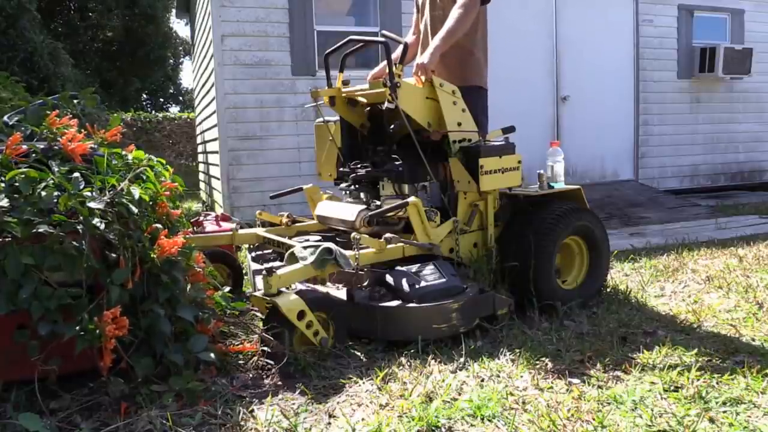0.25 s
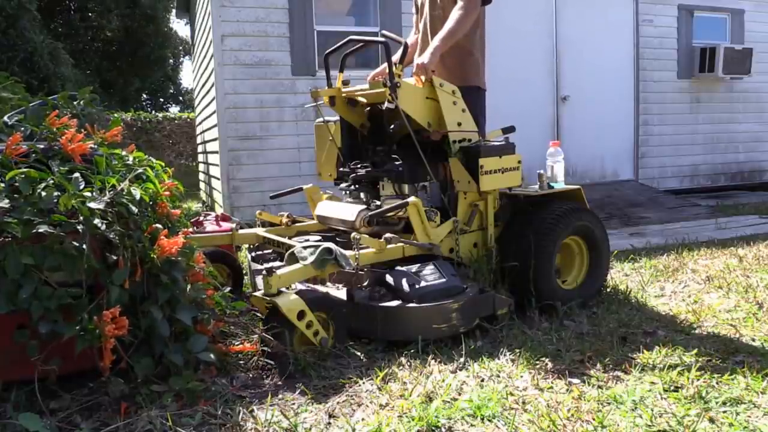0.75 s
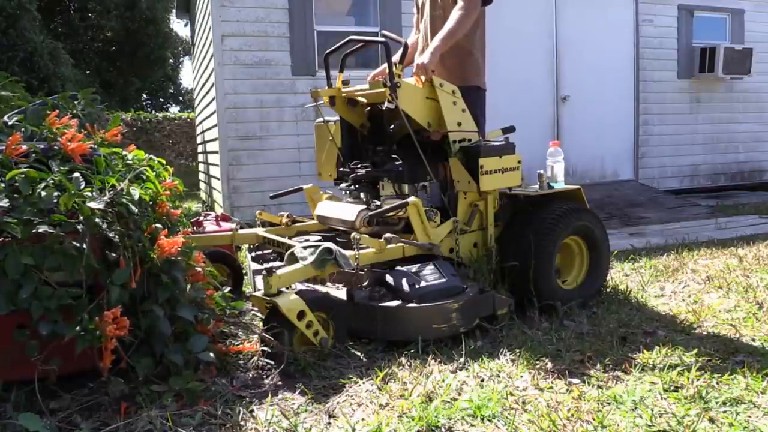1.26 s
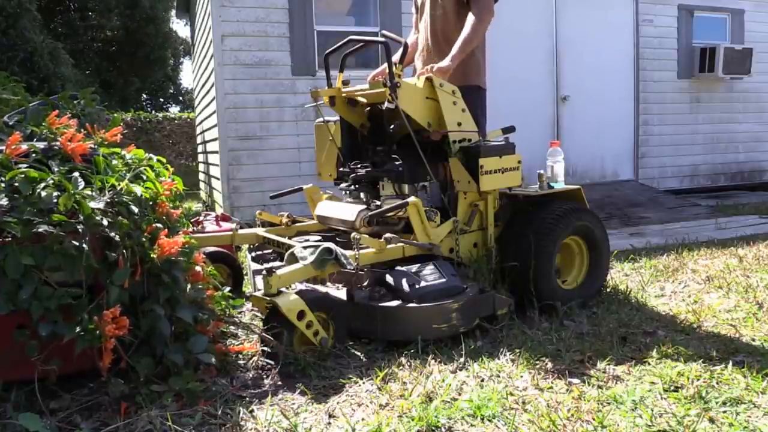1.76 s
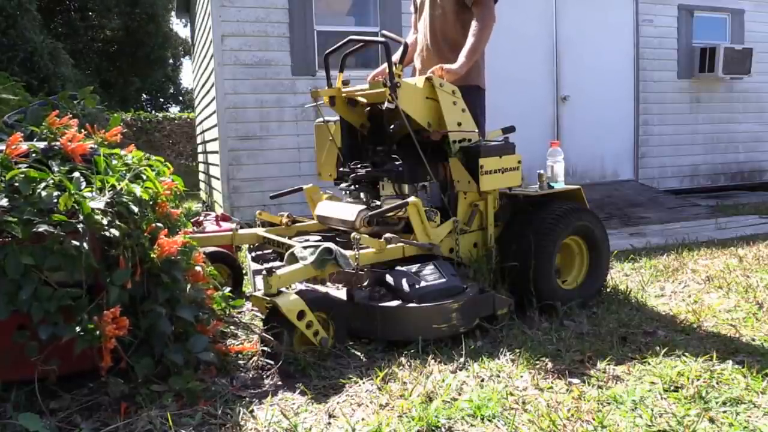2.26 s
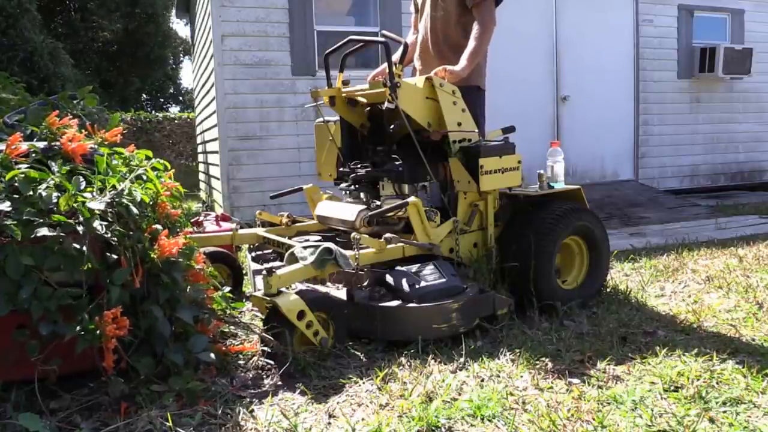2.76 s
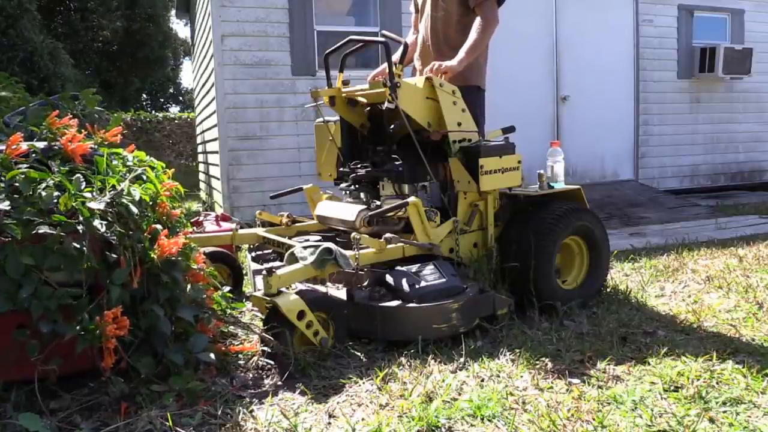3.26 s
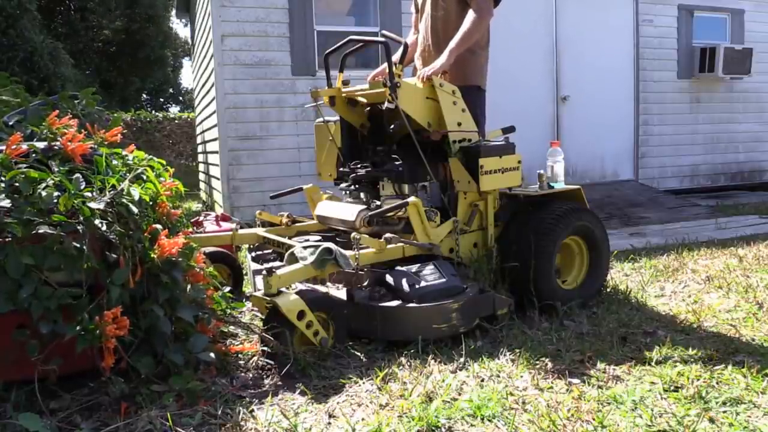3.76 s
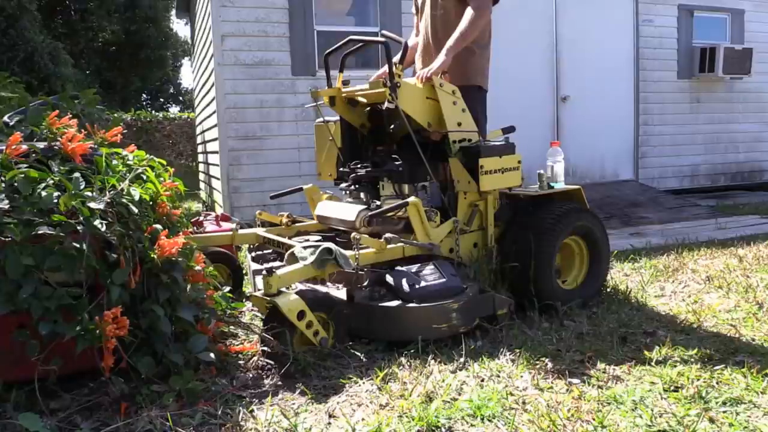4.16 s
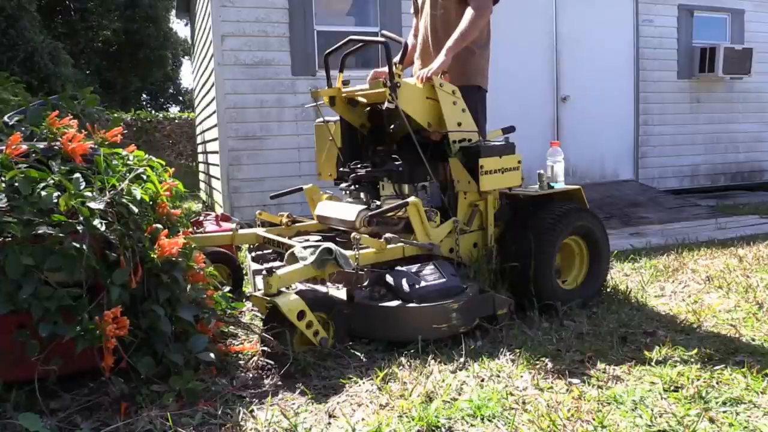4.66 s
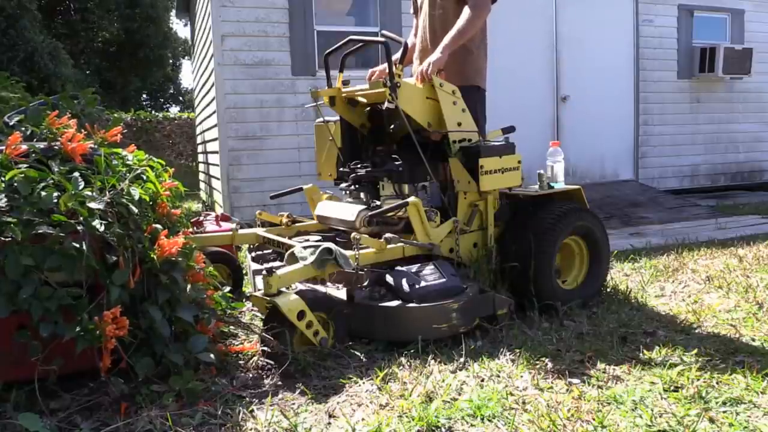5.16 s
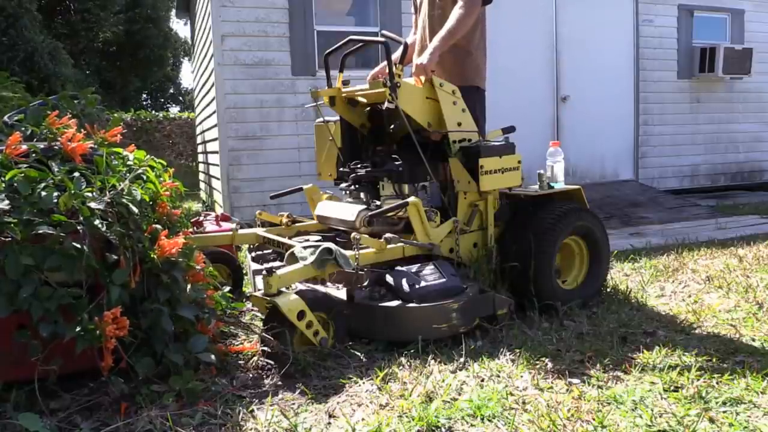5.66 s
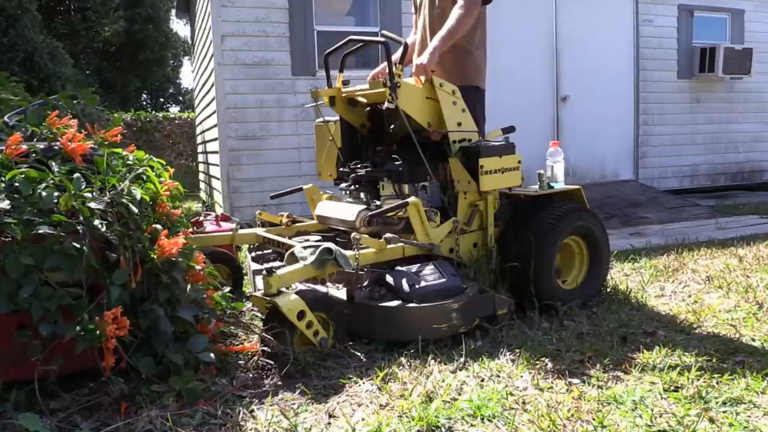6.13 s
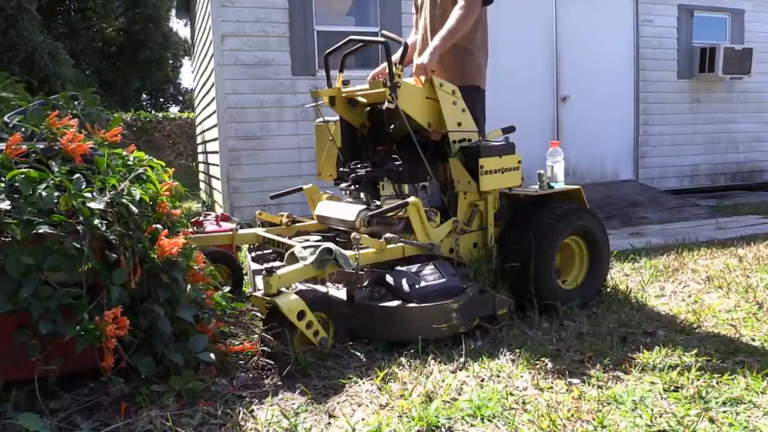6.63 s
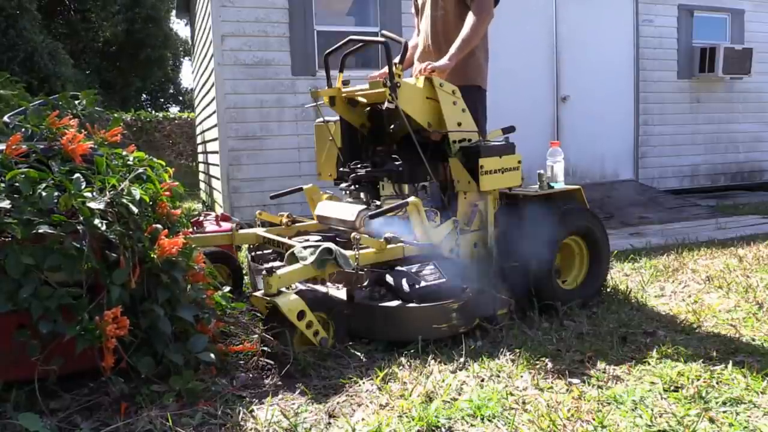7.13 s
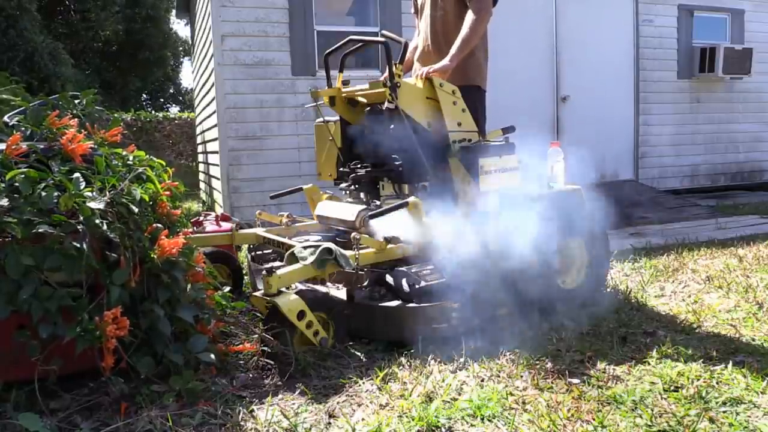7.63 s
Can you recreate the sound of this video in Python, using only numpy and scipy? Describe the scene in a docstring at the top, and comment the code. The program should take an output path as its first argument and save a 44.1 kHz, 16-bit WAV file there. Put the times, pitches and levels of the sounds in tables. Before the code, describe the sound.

A quiet garden by a house, with a mower a few metres away, leaning slightly left, and short scattered reflections. At 0.1 s a metallic click and gear slam start the electric starter: its whine rises quickly within half a second, then creeps slightly higher, a harsh, bright grinding of rattling teeth that pulses with each engine turn. At 3.8 s it lets go abruptly. Clicks and loose drive-train knocks follow as the engine slows, with a short rising, squeaky belt groan around 4.55 s and a faint soft thump at 4.8 s. Near silence until key clicks and a tiny tinkle at 5.05-5.1 s. At 5.3 s the starter slams in and whines up again, stopping around 6.3 s. The engine coughs at 6.4 s, splutters slowly with clicks and misfires, catches around 7 s and gathers speed, knocking, clacking and puffing low exhaust pulses, until the end near 7.9 s.

```python
"""Lawn beside a house: a stand-on mower is started a few metres away, in a quiet garden.
The starter whines up and grinds the engine round with rattling gears (swept tones, tooth strikes), lets go,
and the engine coasts to a stop with a groan (resonant knocks, a gliding tone with overtones).
The key clicks, the starter slams in again (bursts of tiny contacts), and the engine coughs, catches and
gathers speed (knocks, exhaust pulses and valve clacks timed by its cycles)."""
import sys
import numpy as np
from scipy import signal
from scipy.fft import rfft, irfft
from scipy.io import wavfile
from scipy.ndimage import map_coordinates

SR = 44100
rng = np.random.default_rng(int(sys.argv[2]) if len(sys.argv) > 2 else 0)


def file_out(sig):
    """Save sig as 16-bit WAV at sys.argv[1]."""
    # one column per channel
    cols = np.atleast_2d(sig).T
    # limit, then scale
    lim = np.clip(cols, -1, 1)
    pcm = np.round(lim * 32767).astype(np.int16)
    wavfile.write(sys.argv[1], SR, pcm)


N = 347949
TIME = np.arange(N) / SR  # s

# All levels are relative.
# Garden colour: (frequency [Hz], gain [dB])
GARDEN_COLOUR = [(15, -59), (25, -39), (69, -18.5), (91, -4), (133, -3), (297, -11), (1050, -6.5),
                 (1660, -9.5), (5010, -17), (9810, -28), (10600, -27), (13500, -38), (15500, -47)]
GARDEN_DB = -47
# Decay of the scattered tail: (frequency [Hz], t60 [s])
YARD_DECAY = [(100, 0.19), (1000, 0.45), (5000, 0.096), (14000, 0.25)]
# Scattered sound: (frequency [Hz], level [dB])
YARD_SPREAD = [(100, -32), (350, -12), (1000, -12.5), (2800, -8.5), (5500, -6), (9000, -6.5), (14000, -26)]
# Stereo lean of the mower: (frequency [Hz], left minus right [dB])
STEREO_LEAN = [(120, -0.5), (300, -1), (700, 3.5), (1400, 2), (3000, 2.5), (6000, 2.5), (10000, 1.5),
               (14000, -0.5)]
MOWER_DB, EDGE_HZ = -0.56, 15600

# A key on the ring tinkles: (time [s], frequency [Hz], level [dB], decay time [s])
KEY_TINKLES = [(5.103, 2970, -43, .018), (5.05, 6250, -46, .02)]
# Deck belt groan: (time [s], pitch [Hz], level [dB])
BELT_GROAN = [(4.535, 440, -37), (4.55, 451, -42), (4.56, 472, -27), (4.58, 494, -34), (4.61, 500, -37),
              (4.66, 500, -53)]
# Its overtones: (multiple of the pitch [-], level [dB])
BELT_ORDERS = [(1, -0.5), (2, -17), (3, -3.5), (4, -9)]
DULLING_DB_PER_S = 110

# Metal clicks of solenoid, valve gear and key: (time [s], level [dB], treble [dB])
CLICKS = [(0.097, -13, -2.5), (3.881, -4, -19), (3.979, -15, -19), (4.02, -3, -28), (4.111, -9, -15.5),
          (4.347, -15, -19), (5.049, -10, -25), (5.101, -21, -24), (5.3, -21.5, 4), (6.374, -5, -5.5),
          (6.464, -19, -8), (6.996, -9, -8), (7.132, -5.5, -2.5)]
# Pinion slams into the ring gear: (time [s], level [dB])
SLAMS = [(0.123, -8), (5.327, -10.5)]
# Engine rocks back on its mounts: (time [s], level [dB])
THUMPS = [(4.785, -39), (4.815, -51), (4.98, -51)]
# Click and slam colours: (frequency [Hz], gain [dB])
CLICK_COLOUR = [(100, -14), (500, -1.5), (900, 9), (1400, 6), (2200, -4), (3000, 8), (5000, 4), (8000, -1),
                (15000, -19)]
SLAM_COLOUR = [(20, -45), (70, -26), (200, -12), (400, 3), (1500, 4), (2800, 4.5), (3700, -2), (7000, -4.5),
               (10000, -13.5), (15500, -25)]
CLICK_DB, CLICK_TREBLE_DB, CLICK_DECAY_S = -18, 16.5, 0.018  # dB: added to the columns

# Turns of the key: (motor on [s], let go [s], crank position [turns],
# whine [dB], gear rattle [dB], block [dB], puffs [dB])
ATTEMPTS = [(0.125, 3.812, 0, 3.5, -20, -29.5, -43), (5.34, 6.3, 0.24, 1.5, -19, -32, -54)]
# Quick spin-up, then a creep to the top tooth rate
TOP_TOOTH_HZ, SPIN_UP_S, CREEP_SHARE, CREEP_S = 1335.8, 0.2617, 0.1148, 1.897
RING_TEETH, PINION_TEETH = 115, 15
COAST_S = 0.7

# Loose drive train knocks while coasting: (time [s], level [dB])
COAST_KNOCKS = [(3.899, -21), (3.925, -25), (3.981, -28), (4.005, -24), (4.179, -23.5), (4.266, -26),
                (4.319, -26), (4.448, -32)]
# Block and breath colours: (frequency [Hz], gain [dB])
BLOCK_COLOUR = [(60, -33.5), (200, -9), (330, -4.5), (420, 0), (600, 0), (880, 4), (1050, -5), (1220, 2),
                (1600, -1), (2400, -3.5), (3500, -14), (6000, -17), (10000, -33), (15500, -68)]
BREATH_COLOUR = [(20, -40), (40, -19), (70, -4), (110, -2), (175, 0.5), (230, -3.5), (300, -1.5),
                 (450, -16.5), (900, -40)]
# Block resonances: (frequency [Hz], width [Hz], gain [dB])
BLOCK_MODES = [(416, 56, 7.7), (909, 82, 5.9), (1131, 85, 9)]
# One puff per cylinder: (share of the cycle [-], height over the steady flow [dB])
PUFFS = [(0.95, 11.5), (0.337, 8)]
PUFF_GROWTH_DB_PER_S, PUFF_WIDTH_CYCLES = 3, 0.045
# Shudder as the block is jerked from rest; it quietens while coasting
JERK_DB, JERK_S, COAST_DB_PER_S = 7, 0.068, 12

# Engine under its own power: (time [s], block [dB], valve gear [dB], exhaust [dB])
RUNNING = [(6.32, -16.5, -28, -34), (6.336, -22, -26, -31), (6.528, -24, -31.5, -46),
           (6.638, -19.5, -22, -27), (6.766, -20, -30, -47), (6.826, -18, -22.5, -22.5),
           (6.996, -17.5, -19.5, -31), (7.028, -15, -23, -18.5), (7.05, -15, -23, -25),
           (7.758, -19, -21.5, -19), (7.78, -15.5, -22, -22), (7.89, -17.5, -23, -16)]
# Engine speed from the first cough: (time [s], rate [cycles/s])
ENGINE_SPEED = [(6.403, 4.9), (6.72, 4.05), (6.9, 7.27), (7.29, 8.25), (7.42, 10.64), (7.66, 12.12),
                (7.89, 12.84)]
# Pulses within a cycle: (share of the cycle [-], exhaust [dB], valve clack [dB])
STROKES = [(0.146, -6, 2), (0.34, -6, -2), (0.66, -5.5, -1), (0.019, -16, -15)]
# Running colours: (frequency [Hz], gain [dB])
RUN_COLOUR = [(80, -24), (250, 3.5), (400, -3.5), (600, -0.5), (880, 3), (1100, -3), (1400, 3),
              (2200, -4.5), (2700, -2.5), (3500, -8.5), (6000, -19.5), (15000, -32.5)]
VALVE_COLOUR = [(500, -37), (2000, -14), (2700, 3), (3400, 4.5), (4300, 3.5), (5200, 2.5), (6600, 0.5),
                (8300, -2), (9500, -8), (12000, -9), (14000, -21), (15600, -60)]
EXHAUST_COLOUR = [(20, -23), (45, -22), (80, -5), (130, 0), (200, 0.5), (260, -5.5), (400, -6), (900, -14),
                  (3000, -67)]
KNOCK_COLOUR = [(200, -35), (550, -1), (780, 3.5), (1100, -10), (2000, -14), (8000, -39)]
# Valve gear resonances: (frequency [Hz], width [Hz], gain [dB])
VALVE_MODES = [(2630, 80, 8.3), (3550, 230, 3.7), (4830, 83, 3.5)]
# One cough, misfires until it catches, then one knock per cycle
COUGH_DB, CATCH_S, KNOCK_DB, KNOCK_SCATTER_DB = -13.5, 7.05, -10, 1.9
RUN_BLOCK_DB, RUN_VALVE_DB, RUN_EXHAUST_DB = 0.06, 1.5, -1.0  # added to the columns of RUNNING

# Once a turn a piston slows the crank and presses the teeth harder
SAG_SHARE, SAG_AT_TURN, SAG_PRESS_DB = 0.042, 0.92, 1
# Tooth load peaks twice a turn, unevenly over the two turns of a cycle
LOAD_AT_TURN, LOAD_UNEVEN = 0.15, 0.28
# Whine, overtone, gear and rim colours: (frequency [Hz], gain [dB])
WHINE_COLOUR = [(250, -24.5), (460, -18.5), (600, -29.5), (800, -23), (1080, -28.5), (1300, -30)]
HOUSING_COLOUR = [(400, -8), (850, -7), (1050, -3), (1160, 5), (1300, -2), (1550, -5), (1750, -3),
                  (2100, -5), (2400, -6), (2610, 1), (2800, 3), (3200, -7), (3650, -4), (4200, -7),
                  (4700, 1), (5200, 3), (6000, -9), (9000, -14)]
GEAR_COLOUR = [(300, -67), (1000, 0.5), (2000, -9), (2700, 1), (3250, -4), (4000, 0), (5000, 2),
               (5800, -9.5), (7400, -5), (8800, -7), (10000, -14.5), (12000, -17.5), (14000, -23.5),
               (15600, -53)]
ZING_COLOUR = [(2000, -50), (4500, -20), (4870, -7), (5030, -11), (5200, 0), (5380, -13), (5900, -28),
               (6780, -10), (7400, -26), (8630, -8), (9500, -26), (15000, -50)]
# Housing and gear resonances: (frequency [Hz], width [Hz], gain [dB])
WHINE_MODES = [(934, 52, 13.3), (1007, 41, 4.8), (1169, 58, 12.9)]
GEAR_MODES = [(2647, 89, 0), (2823, 185, 11.5), (3260, 240, -4), (3900, 280, 6), (4030, 410, -8.5),
              (4700, 150, 4.5), (5090, 50, 5.5), (6100, 130, 11.5), (6640, 210, 10.5), (8000, 140, 7),
              (8640, 124, 9), (9670, 100, 9.5), (10430, 86, 12), (10793, 150, 6.5)]
# Gear noise as a power of speed, one per attempt: (exponent [-])
RATTLE_POWERS = [1.6, 2.16]
# Noise dies once the pinion is drawn back; the coasting ring gear chatters faintly
LET_GO_DB_PER_S, CHATTER_DB, CHATTER_PATCHY_DB = 260, -30.5, 4
RINGING_DB = 1.0


def amp(db):
    """Decibels to gain."""
    return 10 ** (np.asarray(db) / 20)


def unit(x):
    """Scales to rms 1."""
    return x / np.sqrt(np.mean(x ** 2) + 1e-20)


def read(points, hz):
    """Reads a spectrum table on a log-frequency axis."""
    f, value = np.transpose(points)
    return np.interp(np.log(hz + 1), np.log(f + 1), value)


def level(rows, order):
    """Gain from one dB column of a time table, fading out beyond its ends."""
    rows = np.asarray(rows)
    outside_s = np.maximum(rows[0, 0] - TIME, 0) + np.maximum(TIME - rows[-1, 0], 0)
    return amp(np.interp(TIME, rows[:, 0], rows[:, order])) * np.exp(-(outside_s / 0.013) ** 2)


def drift(hz):
    """Slow random signal of rms 1, up to about hz."""
    f = np.fft.rfftfreq(N, 1 / SR)
    return unit(irfft(rfft(rng.standard_normal(N)) / (1 + (f / hz) ** 4), N))


def colour(x, points, modes=(), size=8192):
    """Causal minimum-phase filter: a broad colour with resonances on top."""
    hz = np.fft.rfftfreq(size, 1 / SR)
    db = read(points, hz) + sum(d / (1 + (2 * (hz - f) / w) ** 2) for f, w, d in modes)
    log_gain = np.log(amp(np.r_[db, db[-2:0:-1]]))
    taps = np.fft.ifft(np.exp(signal.hilbert(log_gain).conj())).real[:size // 2]
    return signal.oaconvolve(x, taps)[:N]


def in_band(x, band_hz):
    """Scales so that the band (low, high) has rms 1."""
    hz = np.fft.rfftfreq(N, 1 / SR)
    inside = (hz > band_hz[0]) * (hz < band_hz[1])
    return x / np.std(irfft(rfft(x) * inside, N))


def burst(at_s, rise_s, decay_s):
    """Envelope that swells up to at_s and dies away after it."""
    return np.exp(-np.maximum(at_s - TIME, 0) / rise_s - np.maximum(TIME - at_s, 0) / decay_s)


def bursts(table, rise_s, decay_s):
    """Sum of bursts from a table of times and levels."""
    return sum(amp(db) * burst(s, rise_s, decay_s) for s, db in table)


def impacts(per_s, spread_db):
    """Random small impacts of uneven size and random sign, rms 1."""
    size = amp(spread_db * np.clip(rng.standard_normal(N), -2, 2))
    return unit((rng.random(N) < per_s / SR) * rng.choice([-1, 1], N) * size)


def garden():
    """Quiet air: coloured noise, partly shared between left and right."""
    air = np.array([unit(colour(rng.standard_normal(N), GARDEN_COLOUR)) for _ in range(3)])
    return amp(GARDEN_DB) * unit(air[2] + .5 * air[:2])


def yard(x):
    """Wall, bushes and ground scatter a short tail of sparse echoes, different left and right."""
    taps = rng.standard_normal((2, SR // 2)) * (rng.random((2, SR // 2)) < 3000 / SR)
    hz, t, z = signal.stft(taps, SR, nperseg=256)
    z = z * amp(-60 * t / read(YARD_DECAY, hz)[:, None])
    spread = amp(read(YARD_SPREAD, hz))
    z *= spread[:, None] / np.sqrt((abs(z) ** 2).sum(2, keepdims=True))
    tail = signal.istft(z, SR, nperseg=256)[1]
    tail *= np.sqrt(np.mean(spread ** 2)) / np.linalg.norm(tail[0])
    return signal.fftconvolve(x[None], tail, axes=1)[:, :N]


def keys():
    """Small keys ring briefly as decaying sines."""
    return sum(amp(db) * burst(s, .0005, decay_s) * np.sin(2 * np.pi * hz * TIME)
               for s, hz, db, decay_s in KEY_TINKLES)


def belt():
    """The belt sticks and slips on its pulley: a wavering harmonic tone whose overtones fade first."""
    s, hz, _ = np.transpose(BELT_GROAN)
    pitch_hz = np.interp(TIME, s, hz) * (1 + .012 * drift(150))
    angle = 2 * np.pi * np.cumsum(pitch_hz) / SR
    dulling_db = DULLING_DB_PER_S * np.clip(TIME - s[2], -.02, .1)
    partials = sum(amp(db - (k > 1) * dulling_db) * np.sin(k * angle) for k, db in BELT_ORDERS)
    return level(BELT_GROAN, order=2) * partials


def clicks():
    """Sharp flurries of contacts in the steel frame, each with its own treble."""
    flurry = unit(colour(impacts(14000, 4.6), CLICK_COLOUR, [(1620, 410, 6.7), (2720, 150, 4.7)]))
    dull = signal.sosfilt(signal.butter(1, 2500, fs=SR, output="sos"), flurry)
    bright = flurry - dull
    return sum(amp(db + CLICK_DB) * burst(s, 0.00048, CLICK_DECAY_S)
               * (dull + amp(treble_db + CLICK_TREBLE_DB) * bright) for s, db, treble_db in CLICKS)


def slams():
    """The pinion hits the ring gear: dense contacts in a short burst."""
    return unit(colour(impacts(12000, 0.8), SLAM_COLOUR)) * bursts(SLAMS, 0.0065, 0.013)


def thumps():
    """The engine rocks on its mounts: soft low-frequency noise bursts."""
    return unit(colour(rng.standard_normal(N), BREATH_COLOUR)) * bursts(THUMPS, 0.0036, 0.026)


def coasting():
    """With no load on it, the drive train knocks to and fro in its slack and rings the block."""
    modes = [(420, 95, 13.0), (880, 450, 6.1), (1260, 210, 9.9)]
    ring = unit(colour(impacts(8000, 2.3), BLOCK_COLOUR, modes))
    return ring * bursts(COAST_KNOCKS, 0.0013, 0.019)


def cranking():
    """Seconds since key on and let go, starter speed 0-1, coasting speed 1-0, crank turns, four gains."""
    on_s, off_s, position, *db = np.array(ATTEMPTS).T
    current = np.maximum(np.searchsorted(on_s, TIME) - 1, 0)
    since_s = np.maximum(TIME - on_s[current], 0)
    after_s = np.maximum(TIME - off_s[current], 0)
    driven_s = since_s - after_s
    speed = (1 - CREEP_SHARE) * (1 - np.exp(-driven_s / SPIN_UP_S))
    speed = speed + CREEP_SHARE * (1 - np.exp(-driven_s / CREEP_S))
    coast = np.maximum(1 - after_s / COAST_S, 0)
    turns = np.cumsum(speed * coast) * TOP_TOOTH_HZ / RING_TEETH / SR
    turns = turns + (position - np.interp(on_s, TIME, turns))[current]
    return since_s, after_s, speed, coast, turns, amp(db)[:, current]


def turning_over():
    """Pistons, cams and pulleys churn in the block while the cylinders puff through the muffler."""
    since_s, after_s, _, coast, turns, (_, _, block_gain, puff_gain) = cranking()
    moving = np.minimum(since_s / 0.012, 1) * coast ** 0.55
    strokes_db = np.zeros(N)
    for share, db in PUFFS:
        offset_cycles = (turns / 2 - share + .5) % 1 - .5
        strokes_db += db * np.exp(-(offset_cycles / PUFF_WIDTH_CYCLES) ** 2)
    knocks = impacts(3000, 2.4) * amp(0.14 * strokes_db + 1.5 * drift(36))
    block = in_band(colour(knocks, BLOCK_COLOUR, BLOCK_MODES), (1450, 2300))
    puffs = rng.standard_normal(N) * amp(strokes_db + 2 * drift(30))
    breath = in_band(colour(puffs, BREATH_COLOUR, [(174, 22, 4)]), (60, 230))
    block_db = JERK_DB * np.exp(-since_s / JERK_S) - COAST_DB_PER_S * after_s
    puff_db = PUFF_GROWTH_DB_PER_S * (since_s - after_s)
    block = block * block_gain * amp(block_db)
    breath = breath * puff_gain * amp(puff_db) * np.minimum(coast / 0.26, 1) ** 2
    return moving * (block + breath)


def running(count=15):
    """Cycles time the combustion knocks, exhaust pulses and valve clacks over the rattle of the block."""
    cough_s, on = ENGINE_SPEED[0][0], TIME > RUNNING[0][0]
    cycles = np.cumsum(np.interp(TIME, *np.transpose(ENGINE_SPEED))) / SR
    cycles = cycles - np.interp(cough_s, TIME, cycles)
    never_s = 2 * N / SR  # for strokes past the end
    pulses, clacks = np.zeros((2, N))
    knocks = amp(COUGH_DB) * burst(cough_s, 0.0014, 0.0074)
    for k in range(-1, count):
        knock_s = np.interp(k, cycles, TIME, right=never_s)
        knock_db = KNOCK_DB + KNOCK_SCATTER_DB * rng.standard_normal()
        knocks += (knock_s > CATCH_S) * amp(knock_db) * burst(knock_s, 0.00097, 0.0083)
        for share, pulse_db, clack_db in STROKES:
            stroke_s = np.interp(k + share, cycles, TIME, right=never_s)
            pulse_scatter_db, clack_scatter = rng.standard_normal(2)
            pulses += amp(pulse_db + pulse_scatter_db) * burst(stroke_s, 0.0002, 0.00044)
            clacks += amp(clack_db + 0.6 * clack_scatter) * burst(stroke_s, 0.00038, 0.01)
    rms_on = np.sqrt(np.mean(on))
    # turbulent splutter first, firming into clean pulses as the engine catches
    splutter = np.interp(TIME, [6.8, 7.5], [6, 1.2]) * on
    gas = unit(pulses) * (1 + .3 * rng.standard_normal(N)) * rms_on
    gas = gas + splutter * rng.standard_normal(N)
    tapping = impacts(9000, 2.5) * (clacks + .48 * on)
    rattling = impacts(6000, 3.0) * (1 + 0.27 * clacks)
    exhaust = colour(gas, EXHAUST_COLOUR, [(128, 18, 6), (197, 24, 7)])
    exhaust = rms_on * in_band(exhaust, (60, 300))
    valves = rms_on * in_band(colour(tapping, VALVE_COLOUR, VALVE_MODES), (3500, 12000))
    block = in_band(colour(rattling, RUN_COLOUR, BLOCK_MODES), (500, 2300))
    knock = knocks * unit(colour(rng.standard_normal(N), KNOCK_COLOUR))
    mix = amp(RUN_BLOCK_DB) * block * level(RUNNING, order=1)
    mix = mix + amp(RUN_VALVE_DB) * valves * level(RUNNING, order=2)
    mix = mix + amp(RUN_EXHAUST_DB) * exhaust * level(RUNNING, order=3)
    return mix + knock


def gear_whine(teeth, mesh, speed, engaged, squeeze):
    """The tooth rate sounds as a tone; its overtones sweep through the resonances of the housing."""
    # the pinion runs slightly out of true: side tones near full speed
    pinion = 2 * np.pi * teeth / PINION_TEETH
    mesh_tone = np.sqrt(2) * np.cos(mesh) * (1 + .6 * speed ** 8 * np.cos(pinion + 1))
    mesh_tone = mesh_tone * (1 + .48 * drift(70))
    whine = colour(mesh_tone * engaged * amp(SAG_PRESS_DB * squeeze), WHINE_COLOUR, WHINE_MODES)
    # backlash frays the overtones at low speed
    backlash = .22 * (1 - speed ** 8) * drift(220)
    stack = sum(np.cos(k * (mesh + backlash)) * (1 + .55 * drift(35)) / k ** .75 for k in range(2, 7))
    overtones = colour(stack * engaged * amp(-16 - 7.5 * speed ** 3), HOUSING_COLOUR)
    return whine + overtones


def gear_rattle(mesh, speed, load):
    """Each tooth lands with its own force, loose teeth chatter, and the ring gear rim zings under load."""
    strikes = np.diff(np.floor(mesh / (2 * np.pi)), prepend=0) * rng.uniform(-1.28, 1, N)
    drive = (.7 * unit(strikes) + impacts(9000, 1.5)) * amp(1.6 * load + .7 * drift(45))
    # the point of contact shifts as the flywheel turns: the ringing flutters
    wander_samples = .00003 * SR * drift(29)
    ringing = colour(drive, GEAR_COLOUR, GEAR_MODES)
    ringing = map_coordinates(ringing, [np.arange(N) + wander_samples], order=3)
    ringing = in_band(ringing, (4500, 11000))
    zing = .62 * speed ** 4 * unit(colour(drive, ZING_COLOUR) * amp(4.5 * load))
    return amp(RINGING_DB) * ringing + zing


def starter():
    """Pinion teeth mesh with the ring gear, whining and rattling, harder twice in every crank turn."""
    since_s, after_s, speed, coast, turns, (whine_gain, gear_gain, _, _) = cranking()
    engaged = np.minimum(since_s / 0.13, 1) * amp(-LET_GO_DB_PER_S * after_s)
    beat = 4 * np.pi * (turns - LOAD_AT_TURN)
    squeeze = np.cos(2 * np.pi * (turns - SAG_AT_TURN))
    load = (np.cos(beat) + 0.26 * np.cos(2 * beat)) * (1 - LOAD_UNEVEN * np.cos(np.pi * turns))
    # uneven until up to speed
    uneven = (.002 + .028 * (1 - speed)) * drift(35) - SAG_SHARE * (1 - speed ** 12) * squeeze
    teeth = np.cumsum(TOP_TOOTH_HZ * speed * (1 + uneven)) / SR
    pinion = 2 * np.pi * teeth / PINION_TEETH
    mesh = 2 * np.pi * teeth + .25 * speed ** 4 * np.sin(pinion) + .15 * drift(150)
    whine = gear_whine(teeth, mesh, speed, engaged, squeeze)
    rattle = gear_rattle(mesh, speed, load)
    power = np.where(TIME < ATTEMPTS[1][0], *RATTLE_POWERS)
    chatter = (after_s > 0) * coast ** 2 * amp(CHATTER_DB + CHATTER_PATCHY_DB * drift(40))
    rattle = rattle * gear_gain * (engaged + chatter) * speed ** power
    return whine_gain * whine * speed ** (0.2 * power) + rattle


def scene():
    """The mower, mostly leaning left, in a quiet garden; each group of parts scatters by its own paths."""
    metal = clicks() + slams() + thumps() + belt() + keys()
    parts = [starter(), turning_over() + coasting(), running(), metal]
    mower = amp(MOWER_DB) * sum(part + yard(part) for part in parts)
    lean_db = read(STEREO_LEAN, np.fft.rfftfreq(N, 1 / SR)) * np.array([[.5], [-.5]])
    return irfft(rfft(mower) * amp(lean_db), N) + garden()


def record(dry):
    """Rounds off peaks near full scale, then limits the band."""
    rounded = dry / (1 + dry ** 6) ** (1 / 6)
    edge = signal.firwin(511, EDGE_HZ, window=("kaiser", 9), fs=SR)
    return signal.oaconvolve(rounded, edge[None], "same", axes=1)


dry = scene()
out = record(dry)
file_out(out)
```